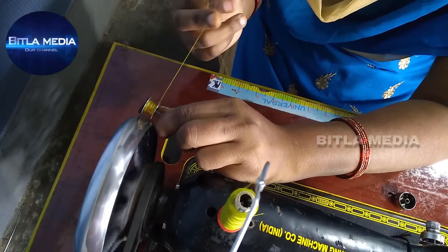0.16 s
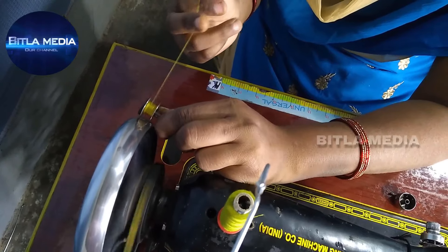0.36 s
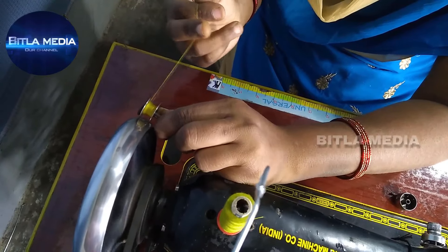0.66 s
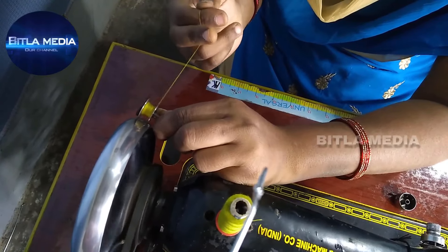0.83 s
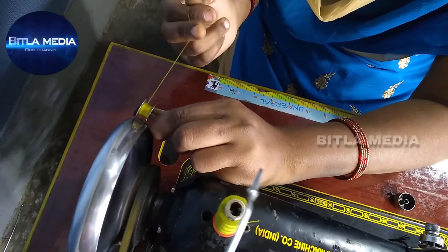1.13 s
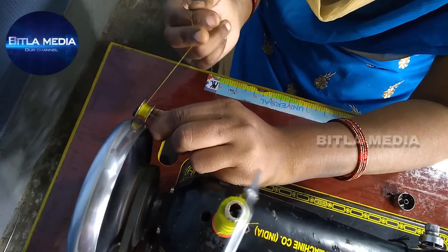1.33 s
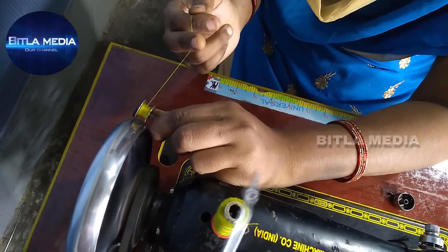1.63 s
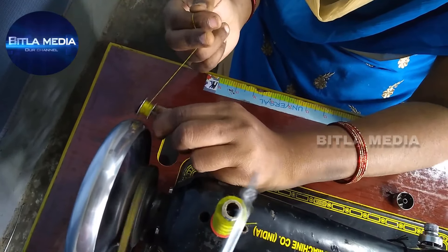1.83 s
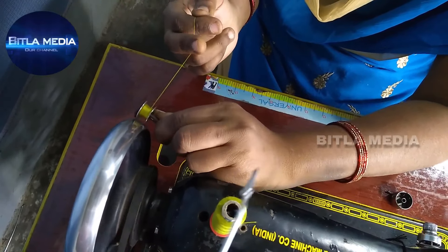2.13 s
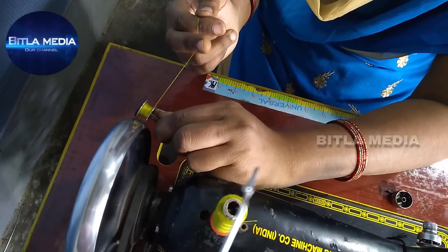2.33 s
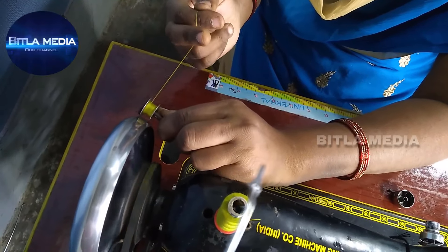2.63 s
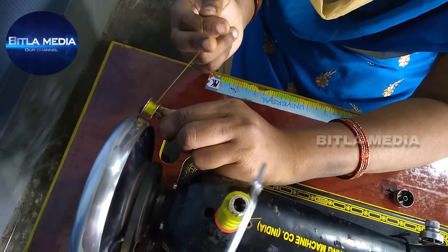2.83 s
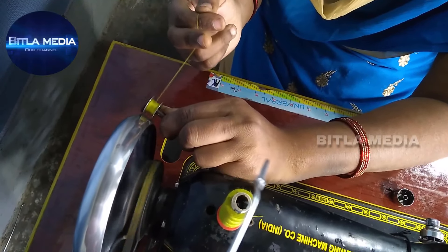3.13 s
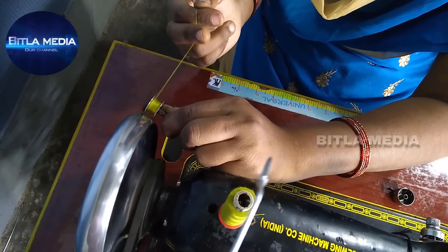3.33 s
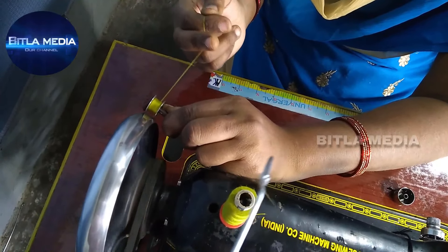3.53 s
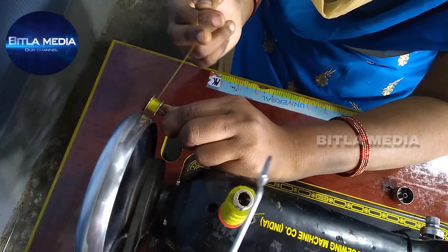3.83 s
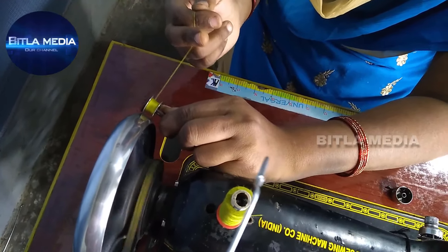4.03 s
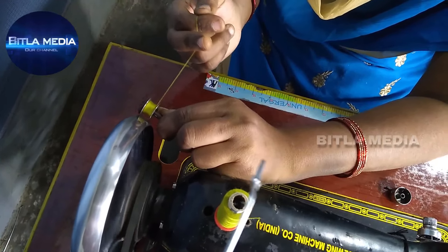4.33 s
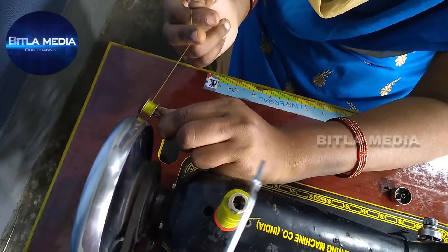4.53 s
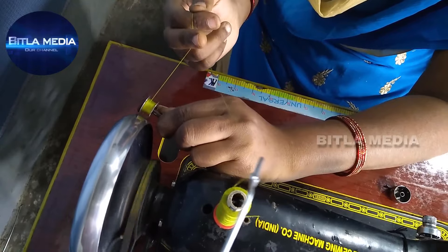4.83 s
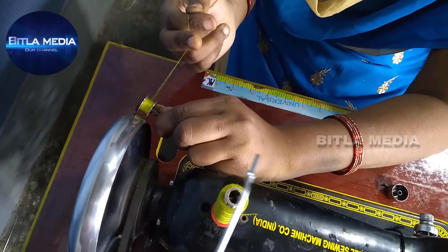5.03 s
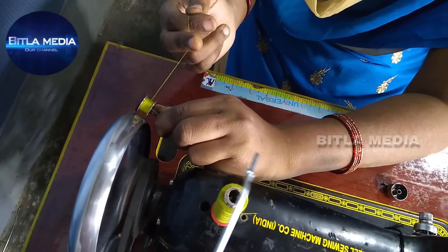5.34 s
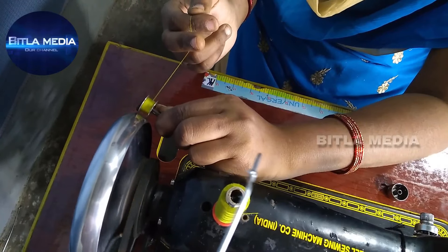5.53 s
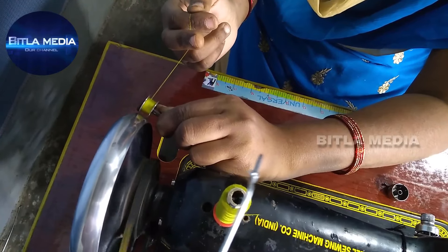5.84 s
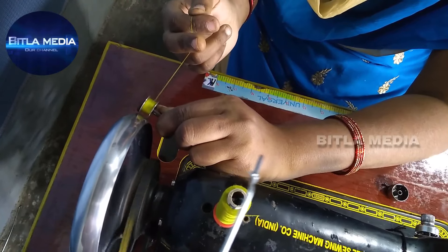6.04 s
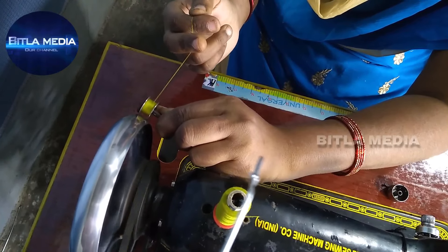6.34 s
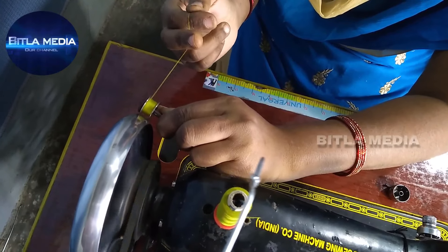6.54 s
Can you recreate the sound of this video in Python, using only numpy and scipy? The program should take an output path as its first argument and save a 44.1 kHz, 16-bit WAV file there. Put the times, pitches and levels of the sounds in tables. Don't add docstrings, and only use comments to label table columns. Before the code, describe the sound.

Close metallic hiss and high steel ringing swell and ease as a foot-driven sewing machine winds thread, its shuttle clacking in fast uneven bursts.

```python
import sys
import numpy as np
from scipy import signal
from scipy.io import wavfile

SR = 44100
rng = np.random.default_rng(int(sys.argv[2]) if len(sys.argv) > 2 else 0)


def put_to_file(sound):
    columns = np.atleast_2d(sound).T
    safe = np.clip(columns, -1, 1)
    whole_steps = np.round(safe * 32767)
    wavfile.write(sys.argv[1], SR, whole_steps.astype(np.int16))


def elevation(decibels):
    levels = np.asarray(decibels, float)
    return 10 ** (levels / 20)


N = 294588

LAST_PUSH_S = 5.965


def rms_one(x):
    return x / np.sqrt(np.mean(x ** 2) + 1e-20)


def level_of(x):
    return x / np.sqrt(np.mean(x.mean(axis=0) ** 2))


def along(rows, t):
    return np.interp(t, *np.transpose(rows))


def drift(rate_hz):
    r = np.exp(-40 * np.pi * rate_hz / SR)
    noise = rng.standard_normal(N // 20 + 3002)
    slow = signal.lfilter([1], [1, -2 * r, r * r], noise)[3000:]
    return np.interp(np.arange(N) / 20, np.arange(len(slow)), rms_one(slow))


def noise_pair():
    return rng.standard_normal((2, N))


def grains(per_s, spread_db):
    born = rng.random((2, N)) < per_s / SR
    size = elevation(spread_db * np.minimum(rng.exponential(1, (2, N)), 4))
    sign = rng.choice([-1, 1], (2, N))
    return rms_one(born * size * sign + 1e-9)


def body(force, grip, modes, wander_db):
    out = np.zeros((2, N))
    for k, (hz, width_hz, level_db, pan_db, alike) in enumerate(modes):
        r = np.exp(-np.pi * width_hz / SR)
        poles = [1, -2 * r * np.cos(2 * np.pi * hz / SR), r * r]
        pair = np.roll(force, 17389 * k, axis=1) * grip
        near, other = signal.lfilter([1 - r, 0, r - 1], poles, pair)
        gain = elevation(level_db + wander_db * drift(2.85))
        lag_samples = 9 if hz > 1000 else 0
        far = alike * np.roll(near, lag_samples) + np.sqrt(1 - alike ** 2) * other
        out[1] += gain * near
        out[0] += gain * elevation(pan_db) * far
    return out


def coloured(force, spectrum, low_hz, high_hz, patchy_db, alike):
    hz, level_db, *pan_db = np.transpose(spectrum)
    edges_hz = np.geomspace(low_hz, high_hz, int(4 * np.log2(high_hz / low_hz)) + 2)
    out = np.zeros((2, N))
    for low, high in zip(edges_hz, edges_hz[1:]):
        band = signal.butter(2, [low, high], "band", fs=SR, output="sos")
        left, right = signal.sosfilt(band, force)
        at = np.log(low * high) / 2
        gain = elevation(np.interp(at, np.log(hz), level_db) + patchy_db * drift(20))
        side = elevation(np.interp(at, np.log(hz), pan_db[0])) if pan_db else 1
        out[0] += gain * side * (alike * right + np.sqrt(1 - alike ** 2) * left)
        out[1] += gain * right
    return out


def wheel(ring_db, hiss_db, grip):
    wheel_hz = [5305, 6045, 6115, 6180, 8285, 8380, 8715, 9612, 10525, 10632, 11901, 12640, 14600]
    # width in Hz, level in dB, left-right in dB, left-right likeness 0-1.
    wheel_modes = [(46.3, -12, -3.5, 0.77), (41.8, -5, -26, 1), (38.6, 2, -17, 0.92), (23.5, -6, 0, 0.93),
                   (82, -19, 6, 0.23), (38.3, -6, -13, 0.35), (49.3, -18, 3, 0.06), (110, -22, -15, 0.2),
                   (56, -7, -10, 0.2), (54.3, -2, -20.5, 0.5), (49.7, -9.5, -47, 0.4),
                   (252, -16.5, -9, 0.55), (250, -19.5, -6, 0)]
    # frequency in Hz, then as above.
    spindle_modes = [(2910, 19, -20, 0, 0.8), (3590, 30, 5.5, -27.5, 0.1), (3993, 16, -1, 3.5, 0.78),
                     (4540, 43, -8, 5, 0.4)]
    # frequency in Hz, level in dB per Hz, left-right in dB.
    hiss_spectrum = [(890, -25, 13), (2080, -34.5, -10), (2830, -23.5, 10.5), (3560, -15, -3),
                     (4540, -43, -9), (5970, -15, 16), (7020, -1, 10), (8450, 14.5, -42),
                     (11553, 19.5, -8.5), (12760, -16, -10), (14000, 11.5, -1), (15000, 10.5, 1.5),
                     (15400, 9, 0)]
    rub = grains(per_s=8100, spread_db=1.5)
    modes = [(hz, *rest) for hz, rest in zip(wheel_hz, wheel_modes)]
    ring = level_of(body(rub, grip, modes, wander_db=1.5))
    spindle = level_of(body(rub[::-1], grip, spindle_modes, wander_db=2))
    scrape = grains(per_s=14000, spread_db=2) * grip
    hiss = level_of(coloured(scrape, hiss_spectrum, 800, 18000, patchy_db=0.7, alike=0.2))
    return ring * elevation(ring_db + 5) + spindle * elevation(hiss_db - 6) + hiss * elevation(hiss_db + 8)


def rub_at(t):
    # time in seconds, level in dB.
    rub = [(0.0, -37.5), (0.05, -37), (0.12, -47.5), (0.48, -38), (0.72, -28.5), (1.12, -28.5),
           (1.77, -36.5), (2.2, -34), (2.47, -29.5), (2.8, -31), (3.3, -27.5), (3.72, -33.5), (4.15, -27),
           (4.57, -37), (5.15, -30), (5.45, -32.5), (5.8, -26.5), (6.25, -33)]
    closing_db = 10.5 * np.maximum(t - LAST_PUSH_S, 0)
    return along(rub, t) + closing_db - slack(t, column=1)


def slack(t, column):
    # deepest at seconds, loss in dB, fading in seconds, returning in seconds,
    # further loss of hiss in dB.
    slacks = [
        (0.291, 30.5, 0.093, 0.17, 12),
        (1.81, 6.5, 0.047, 0.23, 4.5),
        (1.96, 11, 0.15, 0.23, 3),
        (2.95, 8.5, 0.18, 0.28, 0),
        (4.74, 17, 0.13, 0.14, 1),
        (4.85, 15, 0.14, 0.23, 1),
    ]
    return sum(np.interp(t, [row[0] - row[2], row[0], row[0] + row[3]], [0, row[column], 0])
               for row in slacks)


def dulled(x, t):
    top = signal.sosfiltfilt(signal.butter(2, 7200, "high", fs=SR, output="sos"), x)
    return x - top * (1 - elevation(-0.26 * slack(t, column=1)))


def shuttle(t):
    # frequency in Hz, level in dB per Hz.
    clack_spectrum = [(1470, -48), (2500, -12), (3520, -3.5), (4380, -1.5), (5060, 5.5), (6350, 5),
                      (7680, 10.5), (8470, 0.5), (9930, 10), (15300, 15)]
    # frequency in Hz, t60 in seconds, level in dB, left-right in dB.
    arm_modes = [(1550, 0.14, -5, -16), (1638, 0.064, 4, -13), (2114, 0.012, 5.5, -19),
                 (3520, 0.029, 9, -19), (363, 0.041, -45, -24)]
    s, clack_db, knock_db, bright_db = blows()
    at = (s * SR).astype(int)
    dull, bright, knocks = np.zeros((3, N))
    dull[at] = elevation(clack_db)
    bright[at] = elevation(clack_db + bright_db)
    knocks[at + 90] = elevation(knock_db)

    age = np.arange(int(0.06 * SR)) / SR
    decay = np.exp(-(age / 0.008) ** 2) + 0.22 * np.exp(-age / 0.014)
    shape = (1 - np.exp(-age / 0.0005)) * decay
    impacts = grains(per_s=16000, spread_db=1.5)
    rattle = level_of(coloured(impacts, clack_spectrum, 2500, 14500, patchy_db=0.8, alike=0.3))
    low = signal.sosfiltfilt(signal.butter(3, 9000, fs=SR, output="sos"), rattle)
    out = low * signal.fftconvolve(dull, shape)[:N]
    out += (rattle - low) * signal.fftconvolve(bright, shape)[:N]
    out += low * elevation(12 + 1.15 * push_at(t) + 1.7 * drift(30))
    out *= elevation([[-2], [4]])

    for hz, t60_s, level_db, pan_db in arm_modes:
        ring = np.sin(2 * np.pi * hz * age) * elevation(-60 * age / t60_s) * (1 - np.exp(-age / 0.0019))
        strike = knocks * elevation(3.2 * drift(35))
        out += signal.fftconvolve(strike, ring)[:N] * elevation(level_db + 8) * elevation([[pan_db], [0]])
    return out


def blows():
    # time in seconds, peak in dB.
    run = [(1.1304, -18.5), (1.2042, -20), (1.2778, -16.5), (1.3473, -20.5), (1.4124, -18), (1.4783, -20),
           (1.5462, -19), (1.617, -19), (1.6805, -16.5), (1.7448, -18), (1.8124, -18), (1.8882, -19.5),
           (1.9699, -24.5), (2.062, -29.5), (2.1645, -41)]
    # time in seconds, peak in dB.
    clacks = [(0.392, -40.5), (0.451, -35), (0.5643, -35), (0.6774, -26), (0.7647, -25), (0.8532, -23),
              (2.4165, -46), (2.5286, -27), (3.2553, -34), (3.345, -26), (3.447, -34), (3.9592, -30),
              (4.0537, -24), (4.135, -20.5), (4.2215, -24), (4.7957, -45), (4.851, -36), (5.003, -33),
              (5.6104, -26.5), (5.716, -25.5), (5.7938, -22), (5.8746, -22.5), (5.9662, -31),
              (6.4717, -21.5), (6.5666, -20), (6.64, -20)]
    longest_turn_s = 0.1
    s, db = np.transpose(sorted(run + clacks))
    turn_s = np.minimum(np.diff(s, append=s[-1] + longest_turn_s), longest_turn_s)
    knock_db = 10.5 + 0.63 * db + 0.84 * push_at(s)
    bright_db = -38.5 - 0.45 * push_at(s)
    back_s = s + 0.345 * turn_s
    back_db = db - 2.5 - 100 * (longest_turn_s - turn_s)
    return (np.r_[s, back_s], np.r_[db, back_db],
            np.r_[knock_db, knock_db - 17], np.r_[bright_db, bright_db + 3])


def push_at(t):
    # time in seconds, level in dB.
    push = [(0.05, -69), (0.28, -86), (0.5, -62.5), (0.8, -54), (1.05, -57.5), (1.3, -49), (1.95, -51),
            (2.25, -64.5), (2.6, -57.5), (2.9, -73.5), (3.35, -54.5), (3.7, -68), (4.12, -51),
            (4.74, -74.5), (5.1, -57.5), (5.4, -66), (5.8, -49.5), (6.2, -69)]
    return along(push, t) + 29 * np.maximum(t - LAST_PUSH_S, 0)


def frame(rumble_db, hiss_db):
    frame_hz = [35, 150, 215, 285, 353, 430, 533, 605, 1030, 1210, 1490, 1640, 2170, 2800, 3150]
    # width in Hz, level in dB, left-right in dB, left-right likeness 0-1.
    frame_modes = [(40, -15, -4, .93), (40, -12, 0.5, 0.87), (58, -8, 1, 0.99), (21.8, 1, 0.5, 0.98),
                   (19.4, 4.5, 0.5, 0.88), (72.5, -6.5, -6, 0.8), (26.2, 4.5, -26, 0.8),
                   (19.7, -7.5, 8.5, 0.98), (60, -13.5, 2.5, 0.34), (150, -11, -3.5, 0.2),
                   (44.8, -2, -3.5, 0), (96, -4.5, -5, 0), (92, -16, 6.5, 0.2), (200, -11, 4.5, 0.76),
                   (201, -10.5, -5, 0.2)]
    modes = [(hz, *rest) for hz, rest in zip(frame_hz, frame_modes)]
    knocks = grains(per_s=900, spread_db=3)
    looseness = elevation(2.8 * drift(45))
    rumble = level_of(body(knocks, looseness, modes, wander_db=0.14))
    panel = level_of(body(noise_pair(), 1, [(790, 25, 0, -1, 0.95)], wander_db=3.5))
    return rumble * elevation(rumble_db + 4) + panel * elevation(0.63 * hiss_db - 38)


def treadle(t):
    # start in seconds, length in seconds, level in dB.
    groans = [
        (-0.05, 0.16, -66),
        (0.31, 0.48, -60.5),
        (0.95, 0.16, -66),
        (2.33, 0.24, -66),
        (2.986, 0.32, -62.5),
        (3.73, 0.25, -64),
        (4.8, 0.36, -61.5),
        (5.46, 0.42, -64),
        (6.202, 0.4, -66),
    ]
    attack_s, release_s, sag_db_per_s, thump_s = 0.017, 0.083, 18, 0.06
    groan_hz = 104.3 + 2 * drift(6)
    groan = np.sqrt(2) * np.sin(2 * np.pi * np.cumsum(groan_hz) / SR) * elevation(1.5 * drift(8))
    thump = level_of(body(noise_pair(), 1, [(112, 35, 0, 0, 0.99)], wander_db=1))
    stand_modes = [(133, 24, -1, 0, 0.96), (106, 53, -5, 0, 1)]
    stand = level_of(body(noise_pair(), 1, stand_modes, wander_db=4))
    out = stand * elevation(-42.5 + 0.39 * push_at(t))
    for start_s, length_s, db in groans:
        age = np.maximum(t - start_s, 0)
        held = np.clip(np.minimum(age / attack_s, (length_s - age) / release_s), 0, 1)
        out += held * elevation(db) * (groan * elevation(-sag_db_per_s * age) + thump * np.exp(-age / thump_s))
    return out


def room_air():
    # frequency in Hz, level in dB per Hz.
    air_spectrum = [(15, -32), (25, -14), (371, -9), (905, -16), (2210, -50), (2670, 5), (2910, 1),
                    (4000, 16), (5200, -30), (8800, -120)]
    air = coloured(noise_pair(), air_spectrum, 20, 4000, patchy_db=2, alike=0.9)
    return elevation(-82) * level_of(air)


def scene():
    t = np.arange(N) / SR
    ring_db, rumble_db = rub_at(t), push_at(t)
    hiss_db = -1.5 + 0.83 * ring_db + 0.26 * rumble_db - slack(t, column=4)
    grip = elevation(0.41 * drift(5.6) + 0.79 * drift(92) + drift(32))
    rubbing = dulled(wheel(ring_db, hiss_db, grip), t)
    return rubbing + shuttle(t) + frame(rumble_db, hiss_db) + treadle(t) + room_air()


def roll_off(x):
    return signal.sosfilt(signal.butter(12, 15790, fs=SR, output="sos"), x)


def record(dry):
    steep = signal.ellip(8, 1, 75, 15450, fs=SR, output="sos")
    mix = signal.sosfilt(steep, dry)
    return roll_off(mix)


dry = scene()
out = record(dry)
put_to_file(out)
```